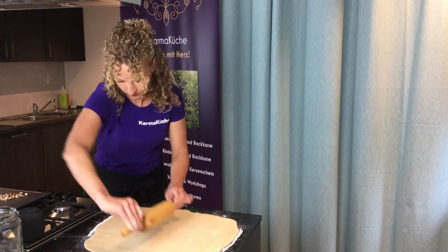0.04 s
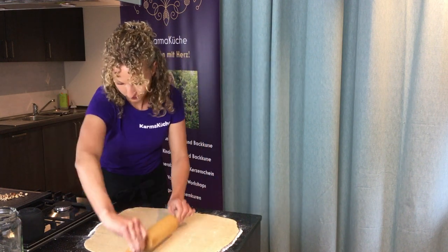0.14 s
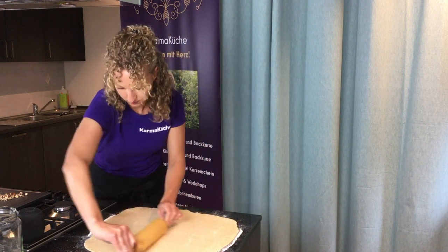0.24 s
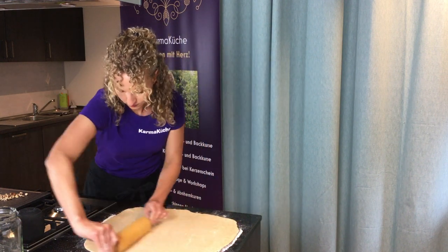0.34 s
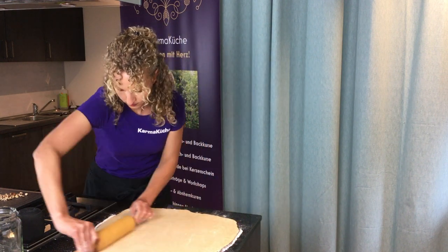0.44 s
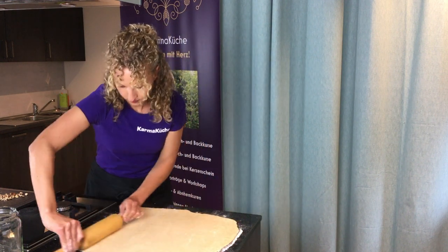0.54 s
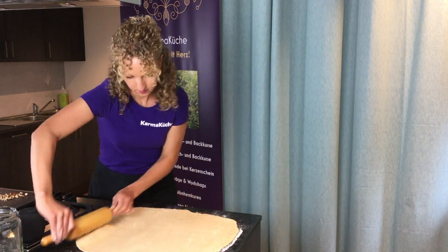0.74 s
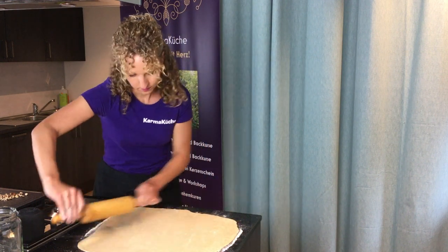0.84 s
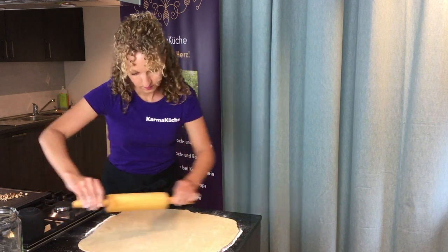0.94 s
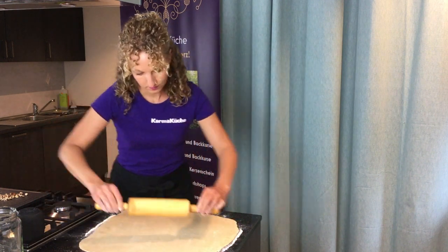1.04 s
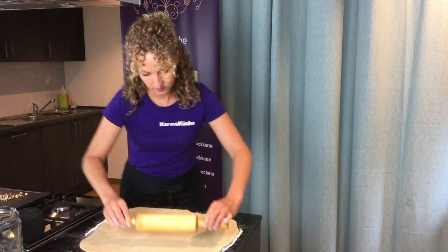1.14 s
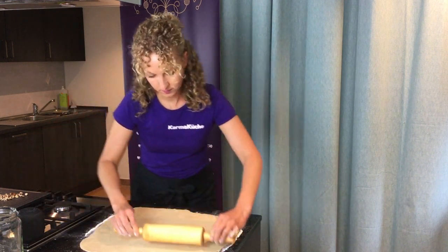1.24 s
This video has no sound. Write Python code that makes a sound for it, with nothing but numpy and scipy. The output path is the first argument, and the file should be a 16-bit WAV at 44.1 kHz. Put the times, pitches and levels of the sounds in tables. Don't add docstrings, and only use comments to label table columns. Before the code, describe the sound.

A wooden rolling pin lands hard on dough, booming the counter, then its handles clack twice

```python
import sys
import numpy as np
from scipy import signal
from scipy.fft import rfft, irfft, next_fast_len
from scipy.io import wavfile
from scipy.ndimage import map_coordinates

SR = 44100
rng = np.random.default_rng(int(sys.argv[2]) if len(sys.argv) > 2 else 0)


def put_to_file(sound):
    columns = np.atleast_2d(sound).T
    safe = np.clip(columns, -1, 1)
    whole_steps = np.round(safe * 32767)
    wavfile.write(sys.argv[1], SR, whole_steps.astype(np.int16))


def how_loud(loudness_db):
    steps = np.asarray(loudness_db, float) / 20
    return 10 ** steps


N = 57330

# (time [s], level [dB], room share [dB], crack level [dB])
KNOCKS = [
    (.034, -51, -12.5, -44.5),
    (0.2376, -17, -9.5, -19),
    (.7232, -25.5, -10, -32),
    (1.0124, -36.5, -9.5, -41),
]


def pin_knocks():
    # (delay [s], level [dB])
    knock_contacts = [
        [(0, 0), (.003, -3), (.018, -6)],
        [(-.002, -24), (0, 0), (.0023, -2), (.0039, 0), (.0066, -9)],
        [(0, -4), (.00068, 0), (.0031, -14)],
        [(-.0007, -6), (0, 0), (.0035, -3), (.0065, -8), (.0125, -5), (.021, -5)],
    ]
    # (frequency [Hz], width [Hz], level [dB])
    tick_modes = [(630, 310, 6.5), (1080, 66, 3.5), (1270, 120, 1), (1760, 150, 5.5)]
    landing_modes = [(1261, 46, -9.5), (417, 80, -12.5), (922, 86, -3), (1290, 357, 5), (1840, 157, 0),
                     (2180, 79, -5), (2550, 270, 3), (3380, 220, -9.5), (4082, 130, -2.5), (4570, 107, -11),
                     (5825, 190, -11.5), (6700, 470, -16), (7120, 440, -14.5), (8100, 660, -30)]
    clack_modes = [(673, 58, -1.5), (885, 119, 4), (1200, 440, -15), (1850, 206, -2.5), (2290, 122, 0.5),
                   (3088, 284, 4.5), (4460, 240, -13), (4590, 110, -12), (5660, 340, -22), (6750, 210, -22)]
    soft_clack_modes = [(700, 177, -6), (1050, 190, 3), (1360, 530, 7.5), (1890, 235, 5.5),
                        (2680, 250, -3.5), (3420, 84, -11), (4550, 200, -6.5), (6130, 400, -13)]
    knock_modes = [tick_modes, landing_modes, clack_modes, soft_clack_modes]
    return sum(knock(*parts) for parts in zip(KNOCKS, knock_contacts, knock_modes))


def knock(row, contacts, modes):
    start_s, db, share_db, crack_db = row
    scatter_s, widen, crack_top_hz, crack_decay_s = 0.0003, 1.41, 7100, 0.0093
    wood = np.zeros(N)
    for k, (hz, width, mode_db) in enumerate(modes):
        clicks = np.zeros(N)
        for (delay, contact_db), (luck, lag) in zip(contacts, rng.uniform(-1, 1, (8, 2))):
            hit_s = start_s + delay + scatter_s * lag * (delay > 0.001)
            clicks[int(hit_s * SR)] = how_loud(contact_db + mode_db + 2 * luck)
        wood += (-1) ** k * wood_mode(clicks, hz, widen * width)

    t = np.arange(N) / SR - start_s
    lowpass = signal.butter(1, crack_top_hz, fs=SR, output="sos")
    crack = signal.sosfilt(lowpass, rng.standard_normal(N))
    crack = how_loud(crack_db) * crack * (t > 0) * np.exp(-np.abs(t) / crack_decay_s)

    size = next_fast_len(2 * N)
    in_room = irfft(rfft(wood + crack, size) * rfft(room_response(share_db), size), size)[:N]
    return how_loud(db - 6.5) * in_room


def wood_mode(x, hz, width):
    softness = 5.9
    b, a = signal.iirpeak(hz, hz / (softness * width), fs=SR)
    return signal.lfilter(b, a, resonance(x, hz, width))


def resonance(x, hz, width):
    radius = np.exp(-np.pi * width / SR)
    angle = 2 * np.pi * hz / SR
    return signal.lfilter([0, np.sin(angle)], [1, -2 * radius * np.cos(angle), radius ** 2], x + 1e-18)


def room_response(share_db):
    # (delay [s], level [dB])
    wall_echoes = [(.0115, -11.5), (0.0165, -8.5), (0.026, -20), (.029, -17.5), (.039, -48)]
    # (frequency [Hz], t60 [s])
    tail_t60 = [(200, 0.47), (700, 0.46), (1400, 0.62), (2800, 0.52), (4500, 0.55), (7000, 0.3),
                (14000, 0.13)]
    # (frequency [Hz], level [dB])
    tail_colour = [(200, 18), (700, 5.5), (1400, 3), (2800, 2.5), (4500, 0), (7000, 5.5), (14000, 3)]
    tail_start_s, tail_rise_s = 0.002, 0.012
    t = np.arange(N) / SR
    tail = np.zeros(N)
    for hz, band in bands(rng.standard_normal((2, N))):
        tail += how_loud(at_hz(tail_colour, hz) - 60 * t / at_hz(tail_t60, hz)) * band
    build_up = 1 - np.exp(-np.maximum(t - tail_start_s, 0) / tail_rise_s)
    response = how_loud(share_db - 23.5) * tail * build_up
    response[0] += 1
    for delay, db in wall_echoes:
        response[int(delay * SR)] += how_loud(db + share_db + 10.5)
    return response


def counter():
    # (delay [s], frequency [Hz], level [dB], t60 [s], build-up [s])
    boom_modes = [(0.029, 62, -29, .35, 0.032), (.03, 69.5, -32.5, .75, 0.028), (0, 66, -32.5, .3, 0.022),
                  (0, 144.3, -26, 0.24, 0.037), (0, 185.3, -29, 0.23, 0.0095), (0, 246.7, -48, .4, 0.0053),
                  (0, 331.3, -46.5, 0.36, 0.012), (0, 423, -30, 0.18, 0.021)]
    # (time [s], frequency [Hz], level [dB], t60 [s])
    dough_presses = [(0.702, 67, -57.5, .4), (0.822, 69, -56, 0.65), (.89, 272, -49.5, 0.2),
                     (1.029, 88, -51, 0.15), (1.124, 67, -51, 0.19), (1.122, 250, -56.5, 0.17)]
    landing_s = KNOCKS[1][0]
    boom = sum(swell(landing_s + delay, *mode) for delay, *mode in boom_modes)
    presses = sum(swell(*press, 0.0034) for press in dough_presses)
    return boom + presses


def swell(start_s, hz, db, t60, rise_s):
    t = np.maximum(np.arange(N) / SR - start_s, 0)
    envelope = how_loud(db - 60 * t / t60) * (1 - np.exp(-t / rise_s)) ** 2
    return envelope * np.sin(2 * np.pi * hz * t)


def rustle():
    # (time [s], level [dB])
    roll_vigour = [(0, -73.5), (0.218, -76.5), (.27, -64), (.45, -61), (.62, -65.5), (.76, -63.5),
                   (1.0, -66), (1.25, -71.5), (1.3, -77)]
    # (frequency [Hz], level per Hz [dB])
    flour_colour = [(1500, 8.5), (3000, 0), (5000, -2.5), (7000, -5.5), (9500, -6.5), (12500, -8),
                    (15500, -2.5)]
    grains_per_s, flour_db = 12000, 4.5
    grains = (rng.random((2, N)) < grains_per_s / SR) * rng.standard_normal((2, N))
    grains = signal.sosfilt(signal.butter(2, 1200, "high", fs=SR, output="sos"), grains)
    flour = how_loud(flour_db) * coloured(grains, flour_colour, patchy_db=2.5)

    rumble_band = signal.butter(2, [56, 470], "band", fs=SR, output="sos")
    rumble = unit(signal.sosfilt(rumble_band, rng.standard_normal(N)))

    times, levels = np.transpose(roll_vigour)
    return how_loud(np.interp(np.arange(N) / SR, times, levels)) * (flour + rumble)


def room_noise():
    # (frequency [Hz], level per Hz [dB])
    air_colour = [(25, -27), (45, -1.5), (90, -7.5), (250, -6), (450, -17.5), (1000, -15.5), (2500, -31),
                  (8000, -30)]
    air_db, whine_hz, whine_db, wander_rad = -62, 672, -69, 0.3
    whine = np.sin(2 * np.pi * whine_hz * np.arange(N) / SR + wander_rad * drift(2.6))
    air = coloured(rng.standard_normal((2, N)), air_colour, patchy_db=1.4)
    return how_loud(air_db) * air + how_loud(whine_db) * whine


def coloured(white, spectrum, patchy_db):
    total = np.zeros(N)
    for hz, band in bands(white):
        total += how_loud(at_hz(spectrum, hz) + patchy_db * drift(9.9)) * band
    return unit(total)


def bands(white):
    edges = 25 * 2 ** np.arange(0, 9.5, 1 / 3)
    for k, (low, high) in enumerate(zip(edges, edges[1:])):
        bandpass = signal.butter(2, [low, high], "band", fs=SR, output="sos")
        yield np.sqrt(low * high), signal.sosfilt(bandpass, white[k % 2])


def drift(rate):
    knots = rng.standard_normal(400)
    return map_coordinates(knots, [np.arange(N) / SR * rate * 2], order=3)


def at_hz(points, hz):
    p = np.array(points)
    return np.interp(np.log(hz), np.log(p[:, 0]), p[:, 1])


def unit(x):
    return x / np.sqrt(np.mean(x ** 2) + 1e-20)


def scene():
    return (pin_knocks() + counter() + rustle() + room_noise())[None]


def low_pass(x):
    return signal.sosfilt(signal.butter(12, 16450, fs=SR, output="sos"), x)


def record(dry):
    # (frequency [Hz], width [Hz], depth [0-1])
    mic_dips = [(4930, 640, 0.52), (10520, 410, 0.46)]
    for hz, width, depth in mic_dips:
        b, a = signal.iirpeak(hz, hz / width, fs=SR)
        dry = dry - np.clip(depth, 0, 1) * signal.lfilter(b, a, dry)
    mic_top_hz = 16250
    mix = signal.sosfilt(signal.cheby2(10, 50, mic_top_hz, fs=SR, output="sos"), dry)
    return low_pass(mix)


dry = scene()
out = record(dry)
put_to_file(out)
```